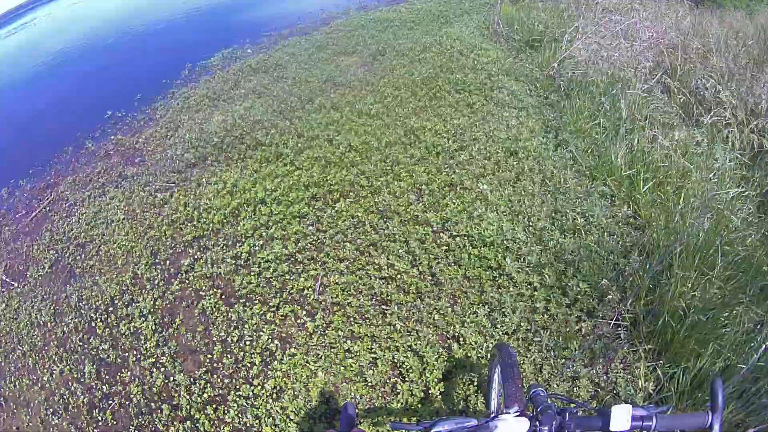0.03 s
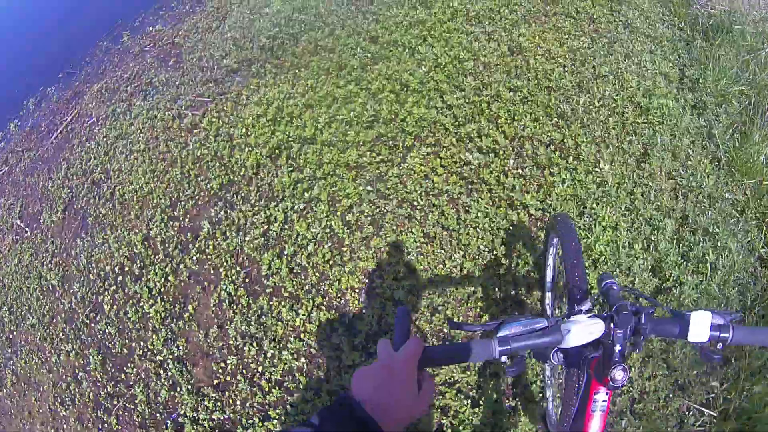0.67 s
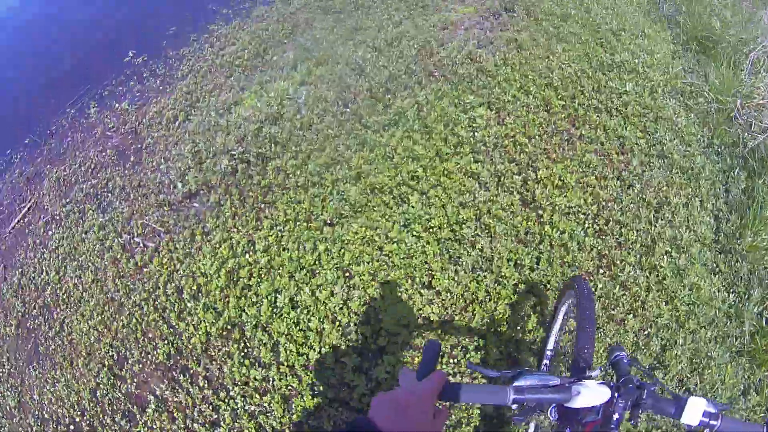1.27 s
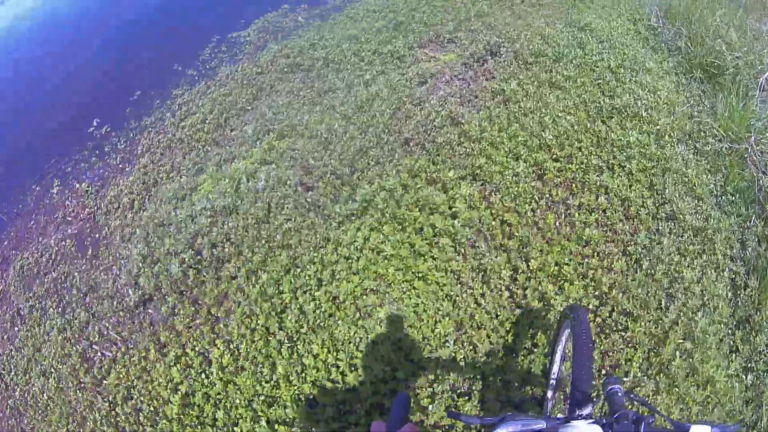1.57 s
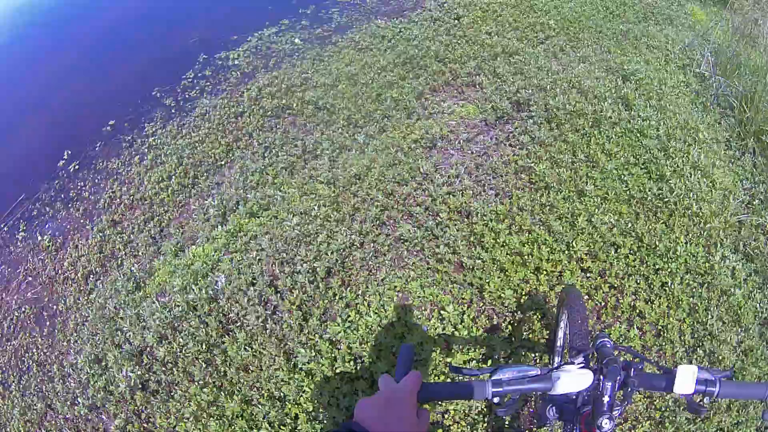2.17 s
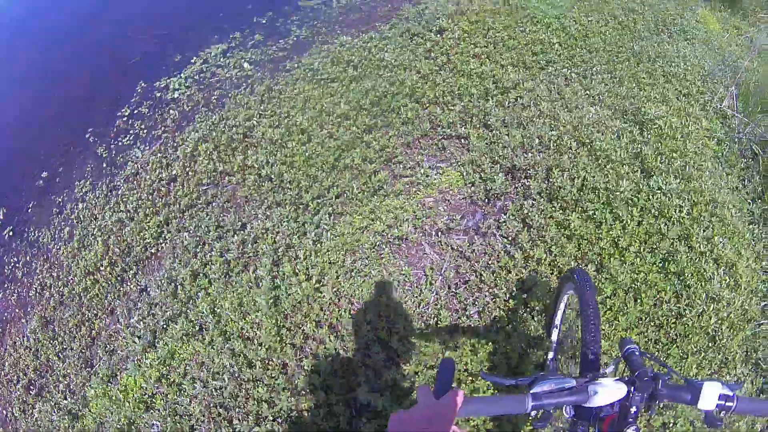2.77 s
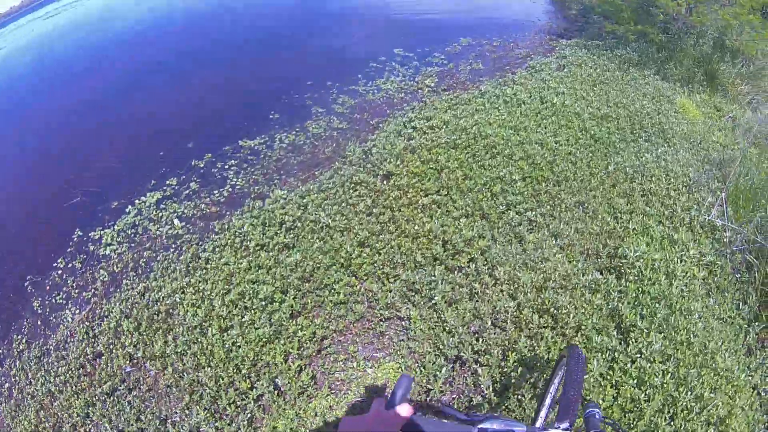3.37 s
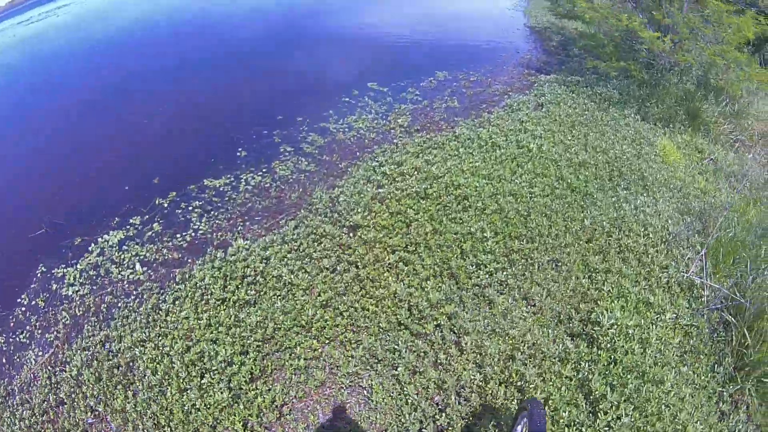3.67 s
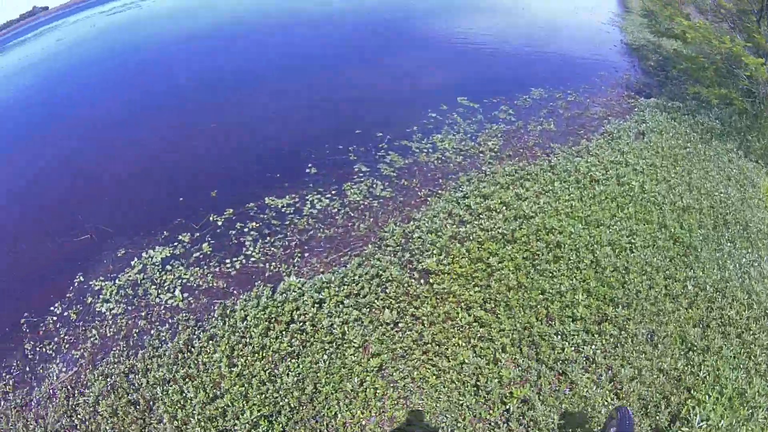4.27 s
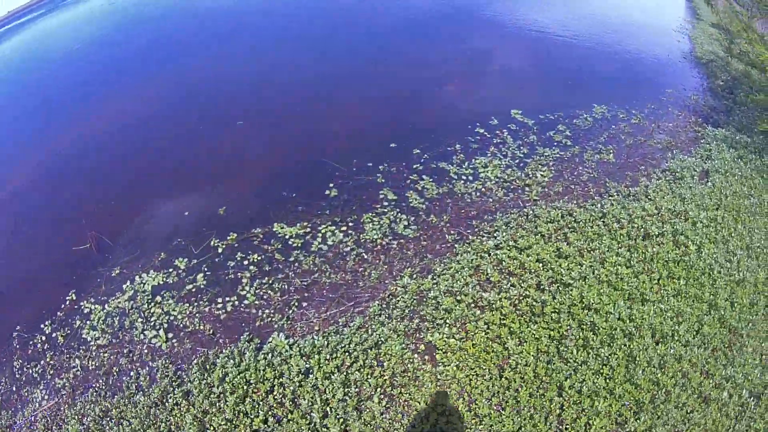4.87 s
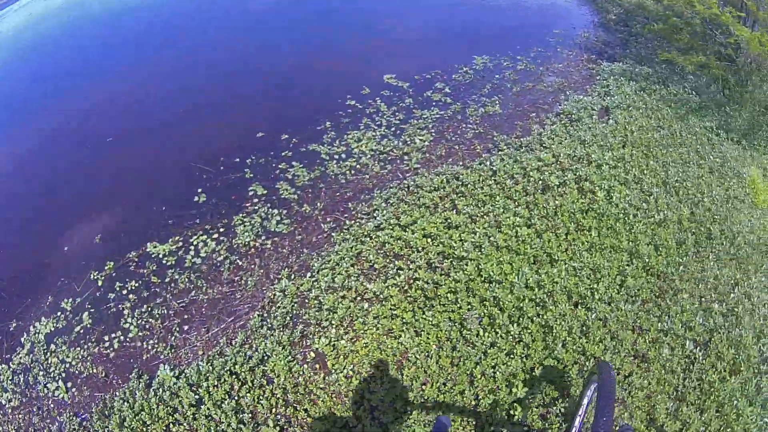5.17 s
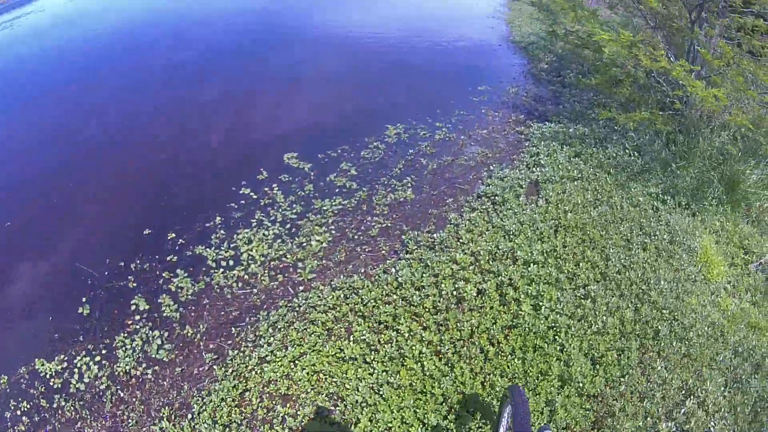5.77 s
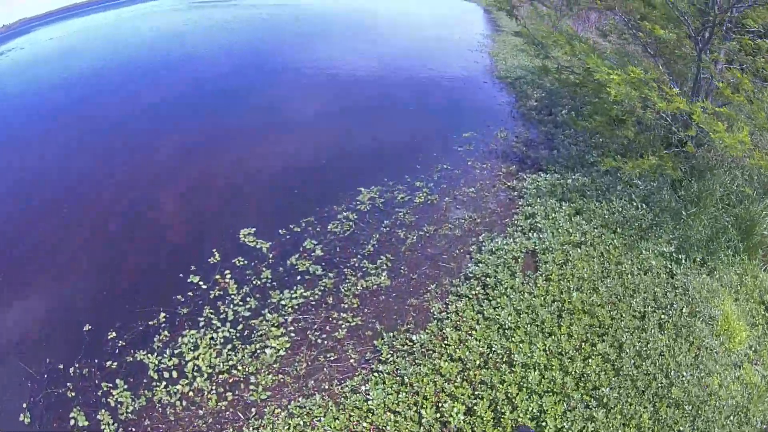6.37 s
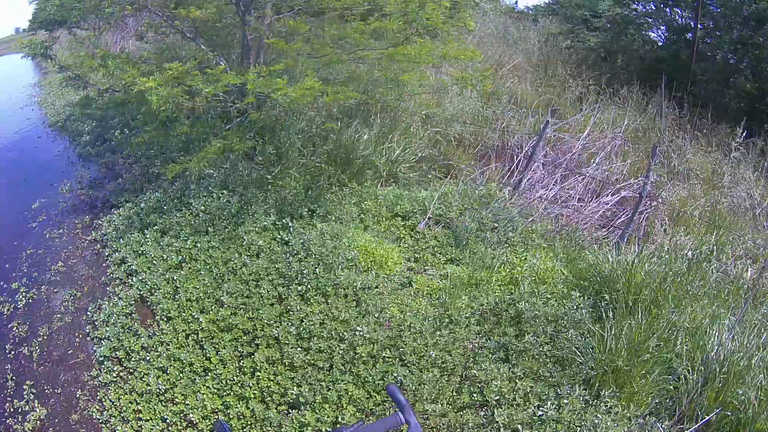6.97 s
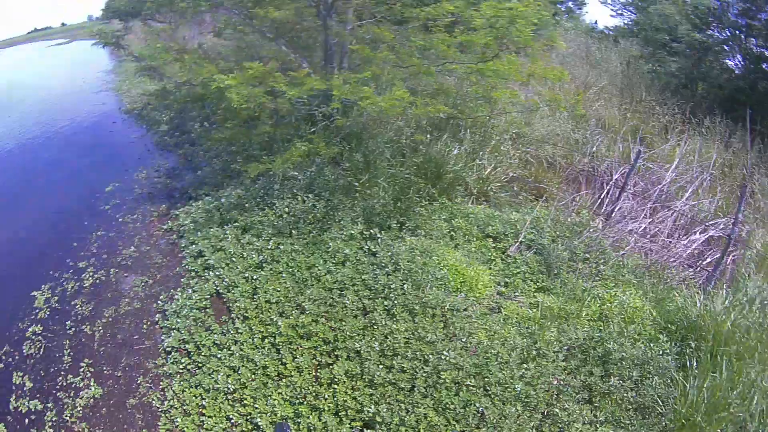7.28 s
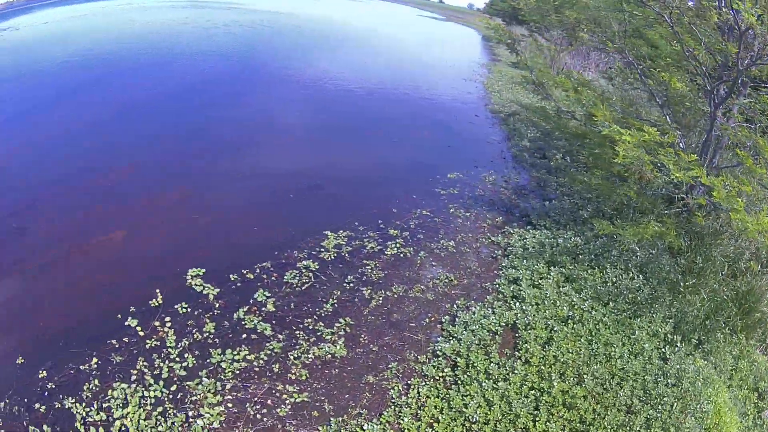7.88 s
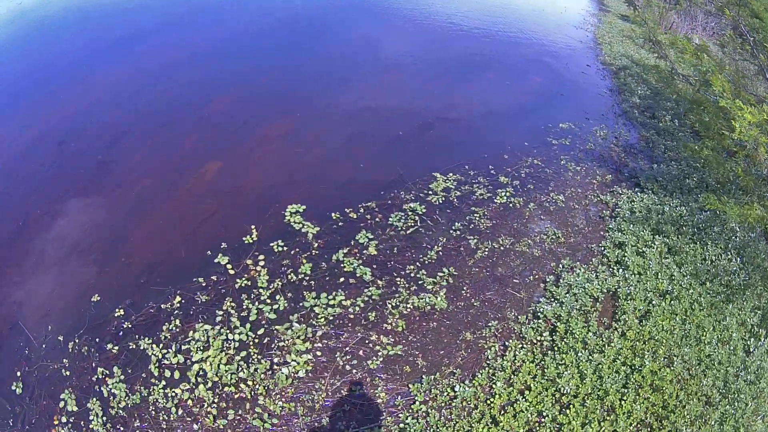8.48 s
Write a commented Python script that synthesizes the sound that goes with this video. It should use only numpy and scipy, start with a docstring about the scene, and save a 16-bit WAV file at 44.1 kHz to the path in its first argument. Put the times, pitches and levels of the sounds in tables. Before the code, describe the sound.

A bicycle pushed through leafy plants clicks and knocks sharply close by, with soft rustling and birds whistling before and after.

```python
"""A lake shore: a bicycle is shoved over lumpy, leafy ground, the microphone above it in a hard case.
At first a near songbird whistles glides while jolts make parts click and knock, each click coloured by
the case; the gain ducks after the loudest. Push by push, tyre and feet rustle in the plants, hardest at
2.5 s. From 6.3 s the walker comes to rest; the songbird returns, a farther bird adds falling notes,
and a trill closes the scene just after 8 s."""
import sys
import numpy as np
from scipy import signal
from scipy.fft import rfft, irfft, next_fast_len
from scipy.io import wavfile
from scipy.ndimage import uniform_filter1d, map_coordinates

SR = 44100
rng = np.random.default_rng(int(sys.argv[2]) if len(sys.argv) > 2 else 0)


def inscribe(sig):
    """Save sig as 16-bit PCM at rate SR to the path in sys.argv[1].

    A 1-D sig is mono; a 2-D sig holds one channel per row.
    Samples are clipped to [-1, 1] before scaling.
    """
    pcm = np.round(np.clip(np.atleast_2d(sig).T, -1, 1) * 32767)
    wavfile.write(sys.argv[1], SR, pcm.astype(np.int16))


N = 380583
TOP_HZ = 15600  # upper edge of the recorder's band


def amp(db):
    """Decibels to gain."""
    return 10 ** (np.asarray(db) / 20)


def unit(x):
    """Scale to rms 1."""
    return x / np.sqrt(np.mean(x ** 2) + 1e-20)


def wobble(rate, size=N):
    """A smooth random curve, rate knots a second."""
    knots = rng.standard_normal(int(size * rate / SR) + 4)
    return map_coordinates(knots, [np.arange(size) * rate / SR])


def filtered(x, response):
    """x through a gain that is a function of frequency."""
    size = next_fast_len(len(x) + SR // 8)
    return irfft(rfft(x, size) * response(np.fft.rfftfreq(size, 1 / SR)), size)[:len(x)]


def coloured(x, points):
    """x shaped by (f/Hz, level/dB) points, at rms 1."""
    f, db = np.transpose(points)
    return unit(filtered(x, lambda hz: amp(np.interp(np.log(hz + 1), np.log(f), db))))


def causal(gain):
    """The most compact causal response that has this gain on an FFT grid."""
    cepstrum = irfft(np.log(np.maximum(gain, 1e-6)))
    half = len(cepstrum) // 2
    return np.exp(rfft(cepstrum * np.r_[1, np.full(half - 1, 2), 1, np.zeros(half - 1)]))


def dying_noise(size, t60):
    """Noise of energy 1 that falls 60 dB in t60 seconds."""
    noise = rng.standard_normal(size) * amp(-60 * np.arange(size) / SR / t60)
    return noise / np.linalg.norm(noise)


def add(track, s, sound):
    """Mix a sound into the track at time s."""
    part = track[max(0, round(s * SR)):][:len(sound)]
    part += sound[:len(part)]


# Spectrum of the still shore: f/Hz, relative level/dB
AIR_SPECTRUM = [(35, -34), (60, -7.5), (81, -3), (183, -10.5), (792, -15), (1070, -11), (1870, -16.5),
                (2100, -12.5), (2910, -15.5), (4030, -16), (6410, -19.5), (7030, -15.5), (9510, -18),
                (14500, -18.5), (15500, -21.5)]
def air(db=-61):
    """Distant air and the microphone's own hiss, both steady."""
    return amp(db) * coloured(rng.standard_normal(N), AIR_SPECTRUM)


# Other birds around the lake: t/s, length/s, f/Hz, width/Hz, rms level/dB before trim
HOARSE_CALLS = [(0.575, 0.014, 2710, 150, -54), (.595, 0.013, 2740, 150, -60),
                (0.644, 0.019, 2680, 150, -55), (0.712, 0.065, 6320, 614, -53),
                (3.53, 0.029, 2220, 300, -58.5), (7.672, 0.04, 2260, 850, -50)]
def hoarse_calls(trim_db=-4.3):
    """Each short call is a tone broken up by fast, irregular beating."""
    out = np.zeros(N)
    for s, length, hz, width_hz, db in HOARSE_CALLS:
        size = int(length * SR)
        beating = wobble(width_hz, size) + 1j * wobble(width_hz, size)
        rasp = np.real(beating * np.exp(2j * np.pi * hz * np.arange(size) / SR))
        add(out, s, amp(db + trim_db) * unit(signal.windows.tukey(size, .5) * rasp))
    return out


def note(length, pitches_hz, crescendo_db=0, flutter_db=1.7, linger=.7, waver=.007):
    """One whistle eases through three pitches, fluttering on its way through the leaves."""
    size = int(length * SR)
    progress = np.linspace(0, 1, size)
    glide = progress + linger * (np.sin(np.pi * progress / 2) ** 2 - progress)  # slow at both ends
    pitch = np.polyval(np.polyfit([0, .5, 1], pitches_hz, 2), glide)
    pitch *= 1 + waver * wobble(196, size)
    swell = signal.windows.tukey(size, .5) * amp(crescendo_db * progress + flutter_db * wobble(83.5, size))
    return unit(swell * np.sin(2 * np.pi * np.cumsum(pitch) / SR))


# A bird farther from the microphone: t/s, length/s, starting f/Hz
FALLING_NOTES = [(7.538, .08, 6000), (7.82, .05, 5550), (7.885, .069, 5120), (8.01, .051, 4950),
                 (8.214, .032, 3700), (8.53, .048, 3700)]
def far_bird(db=-63.3, sag_hz_per_s=8000):
    """Faint whistles, each sagging in pitch."""
    out = np.zeros(N)
    for s, length, hz in FALLING_NOTES:
        sag = sag_hz_per_s * length
        add(out, s, amp(db) * note(length, [hz, hz - sag / 2, hz - sag]))
    return out


# Gliding songbird whistles, mostly near, with one faint, distant one at 3.93 s:
# t/s, length/s, starting f/Hz, middle f/Hz, final f/Hz, rms level/dB before trim, crescendo/dB
SONG_GLIDES = [(.053, .16, 5800, 5200, 4450, -54, 0), (.3, .11, 4550, 4280, 4060, -50, 5),
               (.481, .034, 3750, 3520, 3400, -46, 0), (.52, .052, 6300, 5200, 3700, -53.5, 3),
               (.616, .027, 3780, 3500, 3330, -49, 0), (.788, .05, 3850, 3420, 2950, -48, 0),
               (3.93, .19, 4050, 4480, 4850, -66, -3), (6.957, .098, 4610, 4740, 4960, -49, 0),
               (7.171, .14, 5050, 3780, 3460, -47, 0), (7.3, .29, 3550, 4550, 5230, -51, 8),
               (7.7, .32, 6150, 4200, 3430, -49.5, 7)]
def songbird_glides(trim_db=-4.3):
    """Pure whistles that slide down or up."""
    out = np.zeros(N)
    for s, length, *pitches_hz, db, crescendo_db in SONG_GLIDES:
        add(out, s, amp(db + trim_db) * note(length, pitches_hz, crescendo_db))
    return out


def songbird_trill(start_s=8.136, period_s=.0588, db=-54.8, fade_db_per_s=7, upsweep_db=-59.3):
    """Two arched syllables at half speed, then an even, fading run of falling ones."""
    out, upsweep_s = np.zeros(N), .072
    for beat in [0, *range(2, 9)]:
        age = beat * period_s
        pitches_hz = np.array([5550, 4320, 3950]) * (1 + .012 * rng.standard_normal())
        gain = amp(db - fade_db_per_s * age + rng.standard_normal())
        add(out, start_s + age, gain * note(.046, pitches_hz, crescendo_db=5))
        if beat <= 2:  # a rising lead-in makes the arch
            upsweep = note(upsweep_s, [4100, 5050, 6000], crescendo_db=-5)
            add(out, start_s + age - .9 * upsweep_s, amp(upsweep_db) * upsweep)
    return out


def shore_echo(song, blur_db=-5.5, tail_db=-11):
    """Near branches blur each note at once; trees along the shore scatter a soft tail."""
    blur = amp(blur_db) * dying_noise(SR // 2, t60=.07)
    tail = amp(tail_db) * dying_noise(SR // 2, t60=.36)
    return signal.fftconvolve(song, blur + tail)[:N]


# Shoves of the bicycle: t/s at the height, half length/s, then level/dB before trim of leaves, soil, sway
SHOVES = [(.11, .16, -57.5, -66, -51), (.82, .17, -57, -70, -54), (1.63, .14, -57, -62.5, -46),
          (2.53, .21, -49.2, -57, -40.5), (3.25, .22, -65, -73, -51), (4.5, .14, -57.5, -70, -51),
          (5.38, .14, -57, -74, -55.5), (6.15, .22, -60, -72, -50), (6.83, .11, -57, -60.5, -58)]
def pushing(rest_s=6.3, roundness=1.4, trim_db=(-3, 0, -.5)):
    """Levels in dB of leaves, soil and sway: a slow creep, and a swell and ebb for each shove."""
    t = np.arange(N) / SR
    creep_db, settle_db_per_s = np.array([-63.5, -70, -58.5]), [1.5, 0, 2]
    power = amp(creep_db[:, None] - np.outer(settle_db_per_s, np.maximum(t - rest_s, 0))) ** 2
    for s, half_length, *levels in SHOVES:
        swell = np.exp(-np.abs((t - s) / half_length) ** roundness)
        power += np.outer(amp(levels), swell) ** 2
    return 10 * np.log10(power) + np.array(trim_db)[:, None]


# Spectrum of the leaves below the microphone: f/Hz, relative level/dB
LEAF_SPECTRUM = [(500, -31), (1100, -22), (1550, -5), (1850, -9.5), (2500, -3.5), (3000, -7), (3700, -3.5),
                 (4600, -7), (5600, -10.5), (7000, -14.5), (9000, -26.5), (14000, -43)]
def leaves(db, snaps_per_s=1300, spread_db=3.3, snap_share=.52, patch_db=3.2):
    """Tyre and feet crush leaves in tiny snaps."""
    snaps = (rng.random(N) < snaps_per_s / SR) * rng.standard_normal(N)
    snaps *= amp(spread_db * np.minimum(rng.exponential(size=N), 2))
    crush = snap_share * unit(snaps) + (1 - snap_share) * rng.standard_normal(N)
    # every leaf and stalk favours its own pitch for a moment
    spectra = signal.stft(crush, nperseg=512)[2]
    patches = uniform_filter1d(rng.standard_normal(spectra.shape), size=6, axis=0)
    patches = unit(uniform_filter1d(patches, size=3, axis=1))
    rustle = signal.istft(spectra * amp(patch_db * patches), nperseg=512)[1][:N]
    return amp(db) * coloured(rustle, LEAF_SPECTRUM)


# Spectrum of the ground underfoot: f/Hz, relative level/dB
SOIL_SPECTRUM = [(50, -34), (110, -0.5), (300, -6), (500, -14), (900, -23), (2500, -60.5)]
def soil(db, uneven_db=2.8):
    """Tyre and feet press the soft soil with a low, uneven noise."""
    tread = coloured(rng.standard_normal(N), SOIL_SPECTRUM)
    return amp(db) * unit(tread * amp(uneven_db * wobble(35)))


# Spectrum of the rumble right at the microphone: f/Hz, relative level/dB
SWAY_SPECTRUM = [(15, -2.5), (28, 5), (60, -10.5), (90, -20), (200, -38), (600, -90)]
def sway(db, rock_db=2):
    """The carried camera rocks with the walk and rumbles."""
    rumble = coloured(rng.standard_normal(N), SWAY_SPECTRUM)
    return amp(db) * unit(rumble * amp(rock_db * wobble(10)))


# Dull bumps through the frame, close by: t/s, peak level/dB, f/Hz
FRAME_BUMPS = [(.988, -40, 210), (.992, -43.5, 55), (1.59, -50, 330), (1.635, -46, 60), (2.39, -44, 298),
               (2.512, -28.5, 205), (2.517, -28, 65), (2.597, -45, 282), (3.418, -43.5, 305),
               (4.0987, -25, 172), (4.102, -35, 62), (4.877, -44.5, 290), (5.048, -47, 284),
               (5.925, -49.5, 148), (6.753, -43.5, 288), (6.797, -45, 160), (6.933, -45.5, 148),
               (7.268, -49, 290), (8.03, -51, 198), (8.41, -52.5, 335)]
def frame_bumps(full_scale_cycles=.17, loss_per_db=.054, grit=.61):
    """A jolt swings the frame; the heavier it is, the sooner the soft ground stops it."""
    out, t = np.zeros(N), np.arange(SR // 8) / SR
    for s, db, hz in FRAME_BUMPS:
        cycles = full_scale_cycles * np.exp(-loss_per_db * db)
        age = t * hz / cycles
        swing = np.sin(2 * np.pi * hz * t) + grit * wobble(3.31 * hz, len(t))
        thud = swing * age * np.exp(-2.5 * age)
        add(out, s, amp(db) * thud / np.abs(thud).max())
    return out


# Modes of the hard camera case around the microphone: f/Hz, width/Hz, level/dB
CASE_MODES = [(282, 130, -17), (1560, 163, -8.5), (2126, 150, -3), (2597, 174, 1.5), (2840, 200, -24),
              (3270, 540, -5), (3654, 156, -3), (4580, 285, -5.5), (4820, 130, -16), (4980, 230, -16.5),
              (6020, 270, -18), (6900, 420, -20.5), (7870, 440, -28), (9300, 660, -33), (10440, 300, -32.5)]
# Narrow dips in the tone of the case: f/Hz, width/Hz, level/dB
CASE_DIPS = [(2030, 76, -1), (3030, 110, -3.5), (4300, 47, -13.5), (7660, 140, -14)]
def case_gain(hz):
    """Sound reaches the microphone through the case's short modes; a little leaks through the wall."""
    power = sum((amp(db) / (1 + ((hz * hz - centre * centre) / (2 * width * (hz + 1))) ** 2)) ** 2
                for centre, width, db in CASE_MODES)
    dips_db = sum(db * np.exp(-((hz - centre) / width) ** 2) for centre, width, db in CASE_DIPS)
    leak = amp(np.interp(hz, [1000, 11000, 12500], [-35, -46, -57]))
    return np.sqrt(power + leak ** 2) * amp(dips_db)


def shell_laps(hz, lap_s=.000855, kept=.55):
    """A blow laps the shell of the case a few times, strongest on its first return."""
    delay = np.exp(-2j * np.pi * hz * lap_s)
    return (kept + delay) / (1 + kept * delay)


def rattle(start_s=2.518, length_s=.032, db=-35):
    """Loose parts buzz briefly after the jolt of the hardest shove, then settle."""
    out, size = np.zeros(N), int(length_s * SR)
    chatter = rng.standard_normal(size) * amp(3 * wobble(380, size))
    buzz = unit(filtered(chatter, case_gain))
    add(out, start_s, amp(db) * buzz * np.linspace(1, 0, size) ** .5)
    return out


def faint_contacts(leaves_db, count=28, above_db=21, spread_db=2, db_per_octave=7, chatter_db=-8):
    """Rows for clicks(): random ticks, denser and louder where the wheel crushes most leaves."""
    chance = np.cumsum(amp(leaves_db))
    places = np.searchsorted(chance, chance[-1] * rng.random(count))
    return [(i / SR, leaves_db[i] + above_db + spread_db * rng.standard_normal(), db_per_octave, chatter_db)
            for i in places]


# Bicycle parts striking just below the microphone:
# t/s, peak level/dB before trim, brightness/(dB per octave), chatter/dB
PART_STRIKES = [(.0338, -38, 12, -7), (.1841, -30, -11, -14), (.1901, -6.5, .5, -14),
                (.8384, -.2, 3, -10.5), (.9874, -2, 2.5, -29), (.9959, -11, -2, -4),
                (1.1493, -30.5, -4.5, -19), (1.7321, -18, 3.5, -20), (2.1294, -15, -1.5, -12),
                (2.338, -35, 1, -10), (2.3905, -27, -2.5, -19), (2.4329, -36, -5, 0),
                (2.447, -24.5, 11, -10), (2.4971, -14, 1.5, -21), (2.514, -8, -4.5, -9.5),
                (2.517, -15.5, 15, -20), (2.6917, -26.5, 4, -10), (2.716, -36, -5, -5), (2.728, -30, 8, -1),
                (2.8854, -41, 8, -8), (2.9014, -17.5, 1.5, -18), (2.917, -26, 12.5, -19),
                (3.422, -27, -3.5, -9), (4.0864, -17, 4, -7), (4.0899, -8.5, 1.5, -22),
                (4.1007, -10.5, 2.5, -8), (4.1122, -19.5, 1, -2), (4.2588, -33, -10, -9),
                (4.422, -32, 1, -12), (4.4337, -35.5, 9, -3), (4.4856, -39, 1, 2), (4.6107, -6, 0, -12),
                (4.8822, -34.5, -7.5, -8), (5.0356, -30, .5, -8), (5.0491, -19.5, 3.5, -32),
                (5.3503, -37.5, -6, -5), (5.667, -39, 11, -7), (5.899, -34.5, 1.5, -6),
                (6.077, -34.5, 3, -6), (6.744, -24.5, 2, -10), (6.8057, -15.5, -1.5, -14),
                (6.9365, -35.5, 1, -2), (7.267, -31, 2, -5)]
def clicks(faint, ring_db=-41, colour_db=2, trim_db=.1):
    """Each contact is one sharp tick with a little chatter after it, heard through the case."""
    out, size = np.zeros(N), SR // 10
    hz = np.fft.rfftfreq(size, 1 / SR)
    for s, db, db_per_octave, chatter_db in PART_STRIKES + faint:
        force = amp(chatter_db) * dying_noise(size, t60=.024) + amp(ring_db) * dying_noise(size, t60=.099)
        force[0] += 1  # the blow itself
        tilt_db = db_per_octave * np.log2(np.clip(hz, 1700, 6500) / 3000)  # each contact has a brightness of its own
        # loose, chattering parts add a colour of their own
        knots_db = colour_db * amp(chatter_db / 2) * rng.standard_normal(40)
        own_db = np.interp(hz, np.linspace(0, TOP_HZ, len(knots_db)), knots_db)
        response = causal(case_gain(hz) * amp(tilt_db + own_db)) * shell_laps(hz)
        tick = irfft(rfft(force) * response)
        envelope = np.abs(signal.hilbert(tick))
        add(out, s - envelope.argmax() / SR, amp(db + trim_db) * tick / envelope.max())
    return out


def scene():
    """One microphone: still air behind, birds in the trees, the bicycle close by."""
    song = songbird_trill() + songbird_glides() + far_bird() + hoarse_calls()
    background = air()
    leaves_db, soil_db, sway_db = pushing()
    bicycle = clicks(faint_contacts(leaves_db)) + frame_bumps() + rattle()
    walk = leaves(leaves_db) + soil(soil_db) + sway(sway_db)
    return (background + song + shore_echo(song) + walk + bicycle)[None]


def record(dry, threshold_db=-5, release_db_per_s=6, lag_s=.001):
    """The recorder's gain ducks just after a loud peak and creeps back; its band ends steeply."""
    x, t = dry[0], np.arange(N) / SR
    over_db = np.maximum(20 * np.log10(np.abs(x) + 1e-9) - threshold_db, 0)
    duck_db = np.maximum.accumulate(over_db + release_db_per_s * t) - release_db_per_s * t
    ducked = np.clip(x * amp(-np.interp(t - lag_s, t, duck_db)), -1, 1)
    return filtered(ducked, lambda hz: hz < TOP_HZ)[None]


dry = scene()
out = record(dry)
inscribe(out)
```